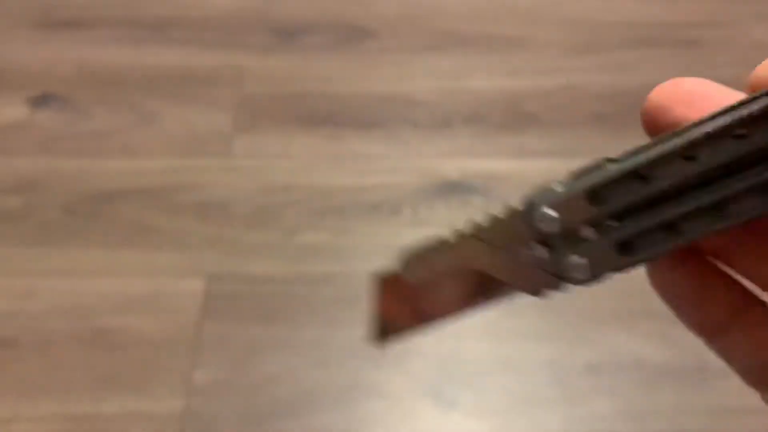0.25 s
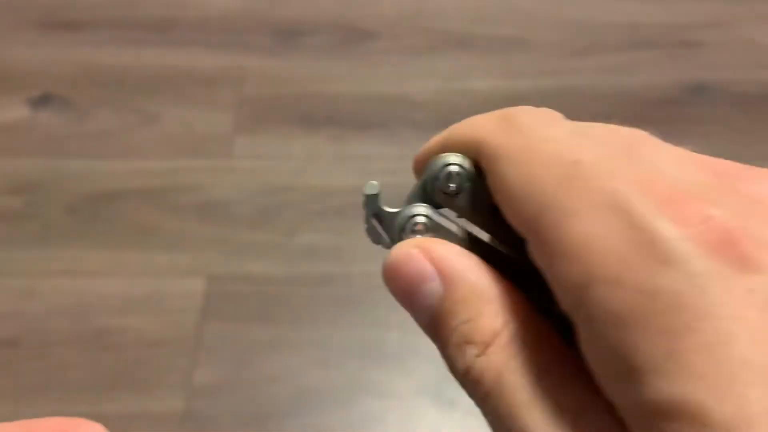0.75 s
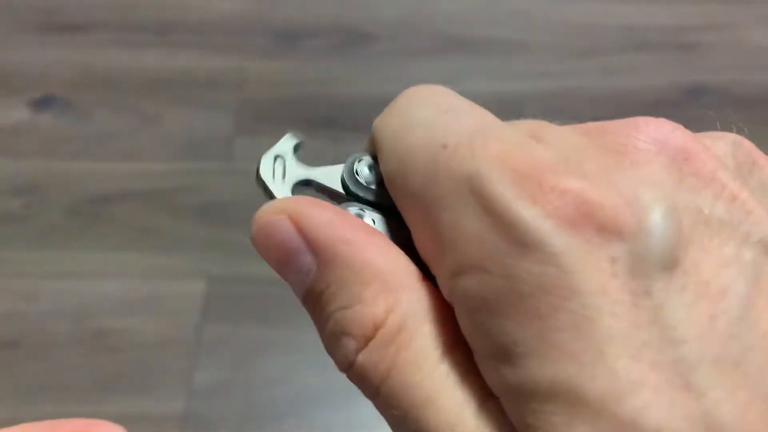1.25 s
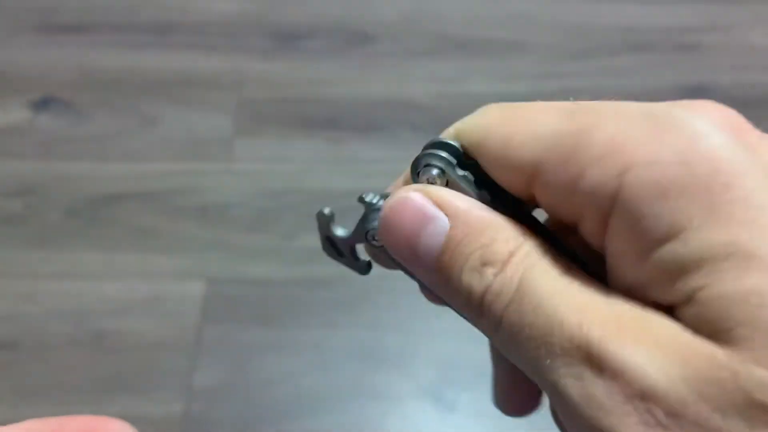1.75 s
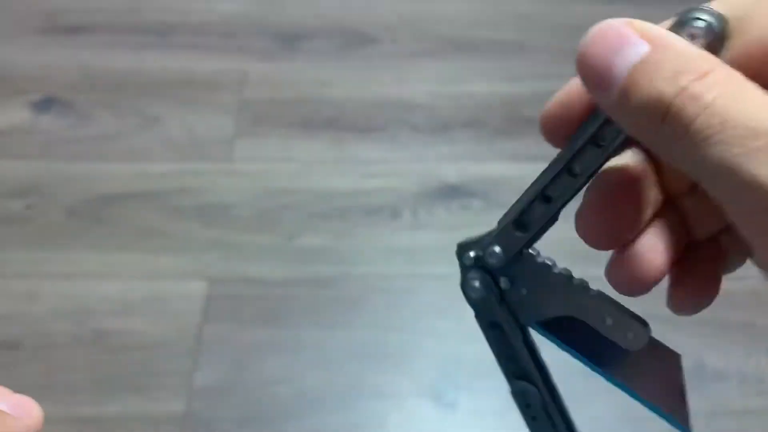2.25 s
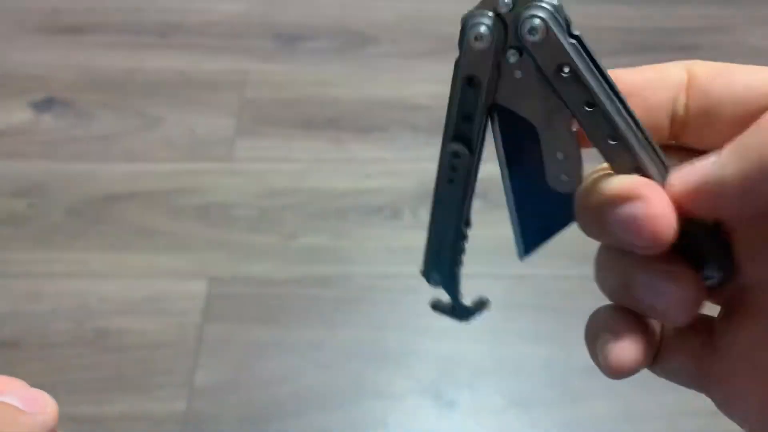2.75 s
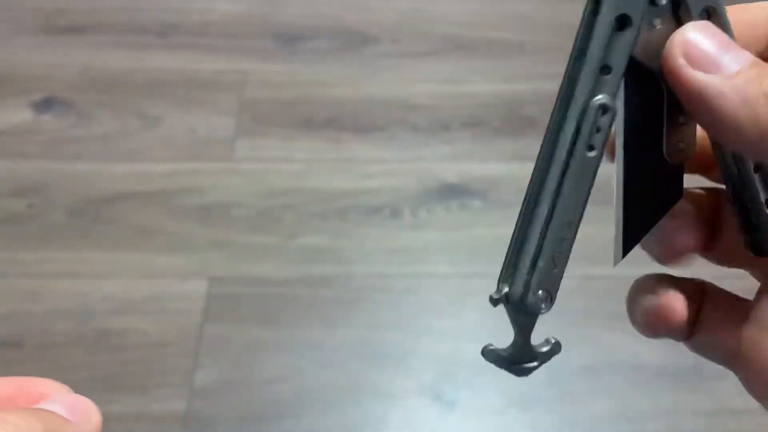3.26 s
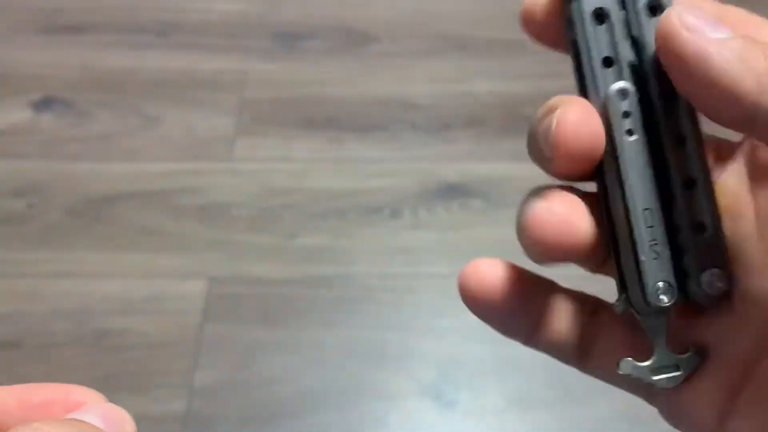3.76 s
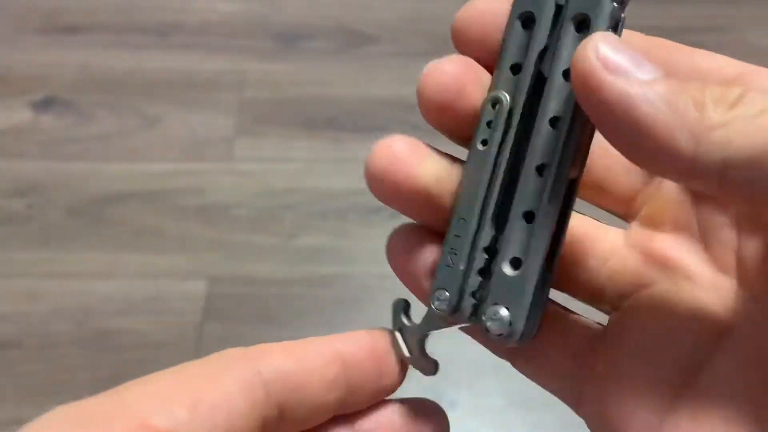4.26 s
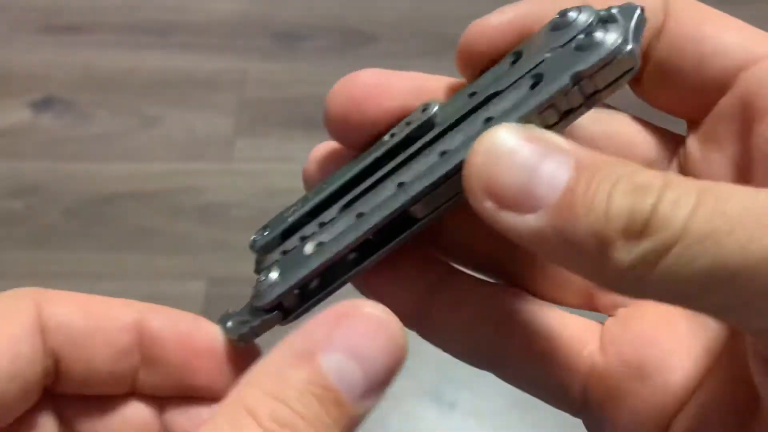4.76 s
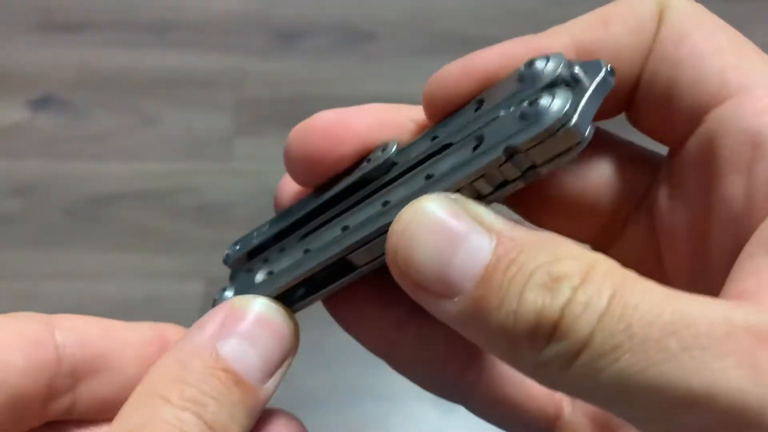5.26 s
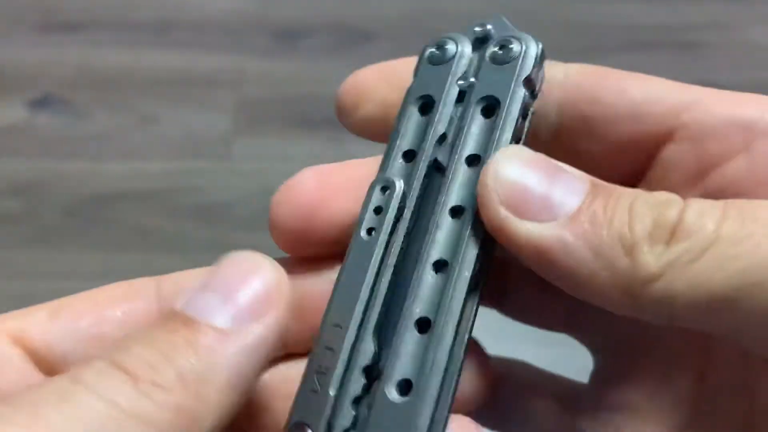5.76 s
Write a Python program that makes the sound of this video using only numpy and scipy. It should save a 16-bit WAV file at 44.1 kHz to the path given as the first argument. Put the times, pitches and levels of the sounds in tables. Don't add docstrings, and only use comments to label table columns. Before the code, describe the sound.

Small steel folding knife handled close up: sparse bright clicks, a sharp latch snap, then two hard metallic clacks in a quiet bare room.

```python
import sys
import numpy as np
from scipy import signal
from scipy.fft import rfft, irfft, next_fast_len
from scipy.io import wavfile
from scipy.ndimage import uniform_filter1d, map_coordinates

SR = 44100
rng = np.random.default_rng(int(sys.argv[2]) if len(sys.argv) > 2 else 0)


def master_out(mix):
    frames = np.transpose(np.atleast_2d(mix))
    ceiling = np.clip(frames, -1, 1)
    pcm = np.round(ceiling * 32767).astype(np.int16)
    wavfile.write(sys.argv[1], SR, pcm)


def how_loud(loudness_db):
    steps = np.asarray(loudness_db, float) / 20
    return 10 ** steps


N = 264732

# time_s, level_db
HOLDER_SHAKE = [(0.0, -74.5), (0.03, -64.5), (1.08, -66.5), (1.19, -45.5), (1.27, -56), (1.3, -42.5),
                (2.22, -62), (3.42, -63.5), (3.59, -59), (3.93, -85), (4.16, -57), (4.53, -68.5),
                (4.56, -63), (4.83, -73), (5.08, -57), (5.35, -56), (5.38, -65), (6.0, -59.5)]
# freq_hz, density_db
SWAY_SPECTRUM = [(10, -62), (25, -15), (33, -10), (45, 0.5), (55, -3.5), (70, -9), (90, -20.5),
                 (130, -49.5), (200, -120)]
# freq_hz, density_db
HUM_SPECTRUM = [(35, -33.5), (60, -0.5), (131, -4.5), (141, -10.5), (152, -12), (183, -8.5), (231, -21),
                (247, -14.5), (265, -15.5), (276, -16.5), (290, -25.5), (318, -25.5), (450, -37.5),
                (580, -74), (990, -120)]
# freq_hz, density_db
HISS_SPECTRUM = [(300, -16.5), (450, 11.5), (1000, 3), (3000, 0.5), (6000, -4), (8000, 1), (10000, -1),
                 (10700, 0), (12000, -2), (14500, -3.5), (15100, -7), (15700, -10), (15900, -46.5)]
TREMOR_DB, HUM_DB, HUM_DRIFT_DB, HISS_DB = 2.5, -59.5, 1.5, -79
HUM_FOLLOWS = 0.25

# middle_s, length_s, pitch_hz, level_db
PIVOT_WHINES = [(2.123, 0.04, 3750, -83), (2.561, 0.24, 10650, -84.5), (2.68, .06, 10600, -83),
                (0.689, .045, 1930, -76), (.688, .035, 4650, -83), (1.635, .04, 3600, -80)]
# middle_s, length_s, pitch_hz, level_db
SKIN_SQUEAKS = [(0.063, 0.03, 8420, -70.5), (0.071, 0.017, 12850, -65), (0.071, 0.024, 2040, -71.5),
                (0.558, 0.071, 11200, -82), (0.587, 0.05, 2780, -76), (1.606, 0.059, 11000, -77.5),
                (2.766, 0.018, 7200, -67.5), (3.02, 0.055, 11200, -76), (3.018, 0.047, 12900, -75),
                (3.026, 0.082, 3380, -85), (4.234, 0.074, 2800, -78.5), (4.533, 0.11, 2820, -79),
                (5.55, .04, 12300, -75), (5.971, 0.091, 6170, -77)]
# middle_s, length_s, pitch_hz, level_db
FINGER_BRUSHES = [(0.267, .03, 12000, -82), (0.68, 0.041, 13100, -72), (.6, 0.14, 7800, -78),
                  (0.678, 0.072, 7100, -74.5), (1.624, 0.028, 6100, -74.5), (2.771, 0.042, 12100, -73.5),
                  (3.172, 0.053, 12700, -83), (3.583, 0.04, 12700, -80), (3.814, 0.035, 10300, -73.5),
                  (3.894, 0.032, 12700, -79), (4.238, 0.028, 7800, -72.5), (4.842, 0.034, 7650, -77),
                  (5.228, 0.095, 7600, -77), (5.69, 0.024, 8070, -79.5)]
WHINE_WIDTH_HZ, SQUEAK_WIDTH_HZ, BRUSH_WIDTH_HZ = 252, 644, 4794

# start_s, peak_db, hollow_db, bright_db
LIGHT_CONTACTS = [(0.444, -66, 2, -28), (0.577, -47, -13.5, -14), (0.8414, -58.5, -14, 3),
                  (0.9444, -65, -7, -20), (1.0067, -53, 2, -16), (1.069, -56, -3, -23),
                  (1.129, -59, -2, -11), (1.1351, -56.5, -23, -12), (1.286, -52, -2, -9),
                  (1.6996, -45.5, -29, -14), (2.04, -57.5, -21, -3), (2.1552, -33, -19.5, -12),
                  (2.295, -55, -7, 1), (2.7602, -45.5, -31, -27), (2.868, -62.5, -13, -23),
                  (2.9786, -56.5, -19, -16), (3.7604, -44, -23.5, -11), (4.0518, -51.5, -18, -18),
                  (4.2478, -47, -14, -20), (4.255, -61, -10, -5), (5.0944, -72, -21, -6)]
# start_s, peak_db, hollow_db, bright_db
BOUNCES = [
    (1.173, -56, 4, -16),
    (2.1346, -55, -16, -29),
    (4.7251, -68, 6, -18),
    (5.2321, -59.5, -1.5, -9),
    (5.2451, -63, -2, -9.5),
    (5.2603, -12.5, -16, -3),
    (5.263, -19, -14, -6),
]
# start_s, peak_db, hollow_db, handle_db, latch_db
STRONG_CONTACTS = [
    (1.1788, -16.5, -22, -15, 6),
    (1.728, -29, -22, -12, 1.5),
    (2.149, -23.5, -26, -17.5, -6.5),
    (3.7167, -32, -22.5, -1.5, -16),
    (4.5763, -12.5, -30, -22.5, 0),
    (4.9967, -17, -16, 4.5, 1),
    (5.2597, -1, -21.5, 1, -1),
]
STRIKES = [1.1783, 1.7274, 2.1474, 3.7165, 4.5763, 4.9967, 5.2594]
# start_s, pitch_hz, level_db, t60_s
STEEL_MODES = [(1.1783, 6680, -25, 0.0093), (1.1783, 10560, -33, 0.01), (1.1783, 12100, -29, 0.011),
               (1.177, 14340, -23.5, 0.007), (1.7263, 7300, -33, 0.017), (1.7274, 8240, -37, 0.018),
               (1.7274, 11400, -44, 0.013), (1.7274, 12000, -39, 0.011), (2.1478, 2300, -44, 0.021),
               (2.1474, 8400, -30.5, 0.0097), (2.1471, 11270, -26.5, 0.014), (2.1474, 14750, -32, 0.013),
               (3.7165, 5450, -41.5, 0.009), (3.7156, 6300, -41.5, 0.017), (3.7165, 9260, -44, 0.011),
               (3.7165, 10700, -42, 0.013), (4.5763, 6500, -35, 0.008), (4.5763, 10000, -28, 0.0074),
               (4.5763, 11800, -34, 0.018), (4.5763, 14850, -29.5, 0.0086), (4.9967, 2670, -28, 0.0062),
               (4.9967, 5850, -28.5, 0.0053), (4.9967, 6800, -33.5, 0.013), (4.9967, 13720, -27.5, 0.007),
               (5.2593, 4340, -22.5, 0.009), (5.2593, 5300, -17, 0.009), (5.2593, 6320, -22, 0.009),
               (5.2593, 9640, -9, 0.007), (5.2593, 11310, -7.5, 0.007), (5.2593, 13800, -8, 0.007)]
# start_s, pitch_hz, level_db, t60_s
SINGING_PARTS = [
    (2.149, 14100, -50.5, 0.22),
    (2.15, 9550, -51.5, 0.13),
    (2.148, 3790, -54.5, 0.33),
    (2.149, 2540, -54, 0.2),
    (5.002, 2570, -61, 0.44),
    (4.588, 2950, -64, 0.17),
]
# start_s, pitch_hz, level_db, t60_s
HANDLE_KNOCKS = [(.945, 2500, -67, 0.021), (1.006, 2700, -77, 0.022), (1.068, 2610, -51, 0.014),
                 (1.178, 2510, -43, 0.026), (1.728, 1480, -64, 0.036), (1.727, 2420, -58, 0.044),
                 (2.1481, 2510, -40, 0.031), (2.1477, 2264, -49, 0.036), (2.759, 2310, -53, 0.013),
                 (2.869, 2260, -65, 0.024), (2.978, 2270, -58.5, 0.017), (3.7163, 2440, -63.5, 0.072),
                 (3.761, 3240, -63, 0.022), (4.051, 3640, -56.5, 0.058), (4.051, 1580, -70.5, 0.03),
                 (4.247, 2730, -72, 0.018), (4.5764, 2640, -44, 0.03), (4.5771, 2960, -41.5, 0.056),
                 (5.261, 3000, -37, 0.017)]
# start_s, pitch_hz, level_db, t60_s
HAND_THUDS = [(1.178, 65, -38.5, .12), (1.177, 240, -39, .04), (1.178, 750, -43.5, .025),
              (1.178, 437, -51, .012), (1.179, 1500, -50, .018), (1.179, 1900, -48, .018),
              (2.156, 1000, -64, .03), (2.155, 1550, -62, .03), (4.998, 476, -56, .025),
              (4.9975, 1050, -55, .02), (5.045, 600, -64, .03), (4.9972, 1750, -53, .012),
              (5.261, 190, -34.5, .04), (5.27, 60, -45.5, .15), (5.26, 700, -42, .02),
              (5.26, 1060, -41.5, .017), (5.2595, 1900, -34, .01)]
LIGHT_T60_S, STRONG_T60_S = 0.0098, 0.007
HARDENING = 0.0065
LATCH_DB = 2
HOLD_S = 0.00081
RATTLE_DB, RATTLE_T60_S = -33, 0.035

# start_s, density_db, tilt_db_per_octave, peak_hz, lift_db
WALL_ANSWERS = [
    (1.1783, -102, -3.5, 6400, 17),
    (1.7274, -114, 3, 9000, -18),
    (2.1474, -104, 2, 5500, 6.5),
    (3.7165, -113, -3.5, 5430, 10.5),
    (4.5763, -105, 2.5, 2950, 0),
    (4.997, -103, -1, 2466, 6),
    (5.2594, -83.5, 2, 3740, 5),
]
# freq_hz, level_db
WALL_COLOUR = [(250, -23.5), (600, -4.5), (2100, -3.5), (4300, 1.5), (9000, 1.5), (14600, -5.5),
               (15500, -16.5)]
# freq_hz, t60_s
ROOM_DECAY = [(300, 0.37), (1500, 0.32), (4000, 0.46), (9000, 0.37), (15000, 0.28)]
TOP_HZ = 15800
PATCHY_DB = 2
WET_DB = 28
TRIM_DB = -104

# freq_hz, likeness (0-1)
ROOM_LIKENESS = [(30, 1), (80, 0.95), (300, .8), (800, .1), (6000, .2), (7100, .99), (8200, 0.94),
                 (9300, 1), (10400, 1), (11600, 1), (13000, 1), (14000, 0.93), (15200, 0.93)]
# freq_hz, likeness (0-1)
NEAR_LIKENESS = [(400, 0.71), (800, 0.68), (4000, 0.35), (5000, 0.76), (7000, 0.94)]
# freq_hz, level_db (up on the left, down on the right)
LEFT_LEAN = [(300, -0.5), (700, 2), (2500, 2.63), (4000, 0.5)]


def unit(x):
    return x / np.sqrt(np.mean(x ** 2) + 1e-20)


def along(points, hz):
    f, v = np.transpose(points)
    return np.interp(np.log(hz + 1), np.log(f + 1), v)


def filtered(x, response):
    n = x.shape[-1]
    m = next_fast_len(n + 2048)
    return irfft(rfft(x, m) * response(np.fft.rfftfreq(m, 1 / SR)), m)[..., :n]


def noise(n, spectrum):
    return unit(filtered(rng.standard_normal((2, n)), lambda hz: how_loud(along(spectrum, hz))))


def wobble(rate):
    return map_coordinates(rng.standard_normal(200), [np.arange(N) * rate / SR])


def patchwork(x):
    return uniform_filter1d(uniform_filter1d(x, size=5, axis=0), size=7, axis=1)


def stereo(pair, likeness):
    def turn(hz):
        angle = np.arccos(np.clip(along(likeness, hz), -1, 1)) / 2
        return np.array([np.cos(angle), np.sin(angle)])

    mid, side = filtered(pair, turn)
    return np.array([mid + side, mid - side])


def add(track, s, x):
    part = track[:, max(round(s * SR), 0):][:, :x.shape[1]]
    part += x[:, :part.shape[1]]


def background():
    shake_s, shake_points_db = np.transpose(HOLDER_SHAKE)
    shake_db = np.interp(np.arange(N) / SR, shake_s, shake_points_db)
    sway_db = shake_db + TREMOR_DB * wobble(6.2)
    hum_db = HUM_DB + HUM_FOLLOWS * (shake_db - shake_db.mean()) + HUM_DRIFT_DB * wobble(5)
    sway = how_loud(sway_db) * noise(N, SWAY_SPECTRUM)
    hum = how_loud(hum_db) * noise(N, HUM_SPECTRUM)
    return sway + hum + how_loud(HISS_DB) * noise(N, HISS_SPECTRUM)


def rub(length, hz, db, width):
    t = np.arange(-SR // 5, SR // 5) / SR
    grain_db = 2.8 * np.repeat(rng.standard_normal(len(t) // 40 + 1), 40)[:len(t)]
    grains = rng.standard_normal((2, len(t))) * how_loud(grain_db)

    def resonance(f):
        return (f < TOP_HZ) * (f > 900) / (1 + (0.67 * (f - hz) / width) ** 2) ** 4.2

    return t[0], how_loud(db) * np.exp(-(2 * t / length) ** 2) * unit(filtered(grains, resonance))


def fingers():
    out = np.zeros((2, N))
    for width, rubs in [(WHINE_WIDTH_HZ, PIVOT_WHINES), (SQUEAK_WIDTH_HZ, SKIN_SQUEAKS),
                        (BRUSH_WIDTH_HZ, FINGER_BRUSHES)]:
        for s, length, hz, db in rubs:
            lead, swell = rub(length, hz, db, width)
            start = s + lead
            add(out, start, swell[:, max(-round(start * SR), 0):])
    return out


def ring(hz, db, t60, rise):
    t = np.arange(min(round(2 * t60 * SR), SR // 2)) / SR
    envelope = how_loud(db - 60 * t / t60) * (1 - np.exp(-t / rise))
    return envelope * np.sin(2 * np.pi * (hz * t + np.array([[0], [1 / 4]])))


def room(colour, db, size=SR // 4):
    ripple = np.cumsum(rng.standard_normal(40))
    ripple = ripple[2:] - ripple[:-2]

    def uneven(f):
        return (f < TOP_HZ) * how_loud(1.1 * np.interp(f, np.linspace(0, SR / 2, 38), ripple))

    hz, t, z = signal.stft(filtered(noise(size, colour), uneven), SR, nperseg=128)
    echoes = uniform_filter1d(rng.standard_normal(z.shape[1:]), size=3, axis=0)
    patches = unit(uniform_filter1d(echoes, size=9, axis=1))
    decay_db = 60 * t / along(ROOM_DECAY, hz)[:, None]
    tail = signal.istft(z * how_loud(db + PATCHY_DB * patches - decay_db), SR, nperseg=128)[1]
    tail = tail * (1 - 0.5 * np.exp(-np.arange(tail.shape[1]) / SR / 0.02))
    return np.pad(tail, ((0, 0), (round(0.0119 * SR), 0)))


def onset(s):
    return min(STRIKES, key=lambda when: abs(when - s))


def contact(db, low_db, middle_db, top_db, t60):
    t = np.arange(2048) / SR
    colour = [(800, low_db - 31), (2800, low_db + 13.5), (4000, min(low_db, middle_db) + 6.5),
              (5800, middle_db + 3.0), (10000, -5.5), (14500, top_db), (16000, top_db - 6.0), (17000, -44.0)]
    crack_decay = how_loud(-60 * np.maximum(t - HOLD_S, 0) / t60)
    rattle_decay = how_loud(RATTLE_DB - 60 * t / RATTLE_T60_S)
    shape = (crack_decay + rattle_decay) * (1 - np.exp(-t / 0.00054))
    crack = how_loud(db - 7.5) * unit(shape * noise(len(t), colour)) * np.sqrt(np.mean(shape ** 2))
    scrape = how_loud(db - 47 - 60 * t[::-1] / 0.05) * noise(len(t), colour)
    return np.hstack([scrape, crack]), colour


def contacts(near, far):
    lead = 2048 / SR
    for s, db, *parts_db in STRONG_CONTACTS:
        t60 = STRONG_T60_S * (1 - HARDENING * (db + 14.0))
        add(near, onset(s) - lead, contact(db, *parts_db, t60)[0])
    for s, db, low_db, bright_db in [*LIGHT_CONTACTS, *BOUNCES]:
        sound, colour = contact(db, low_db, bright_db - LATCH_DB, bright_db + LATCH_DB, LIGHT_T60_S)
        add(near, s - lead, sound)
        add(far, s, room(colour, db - 42.5))


def handle_knocks(near, far):
    for s, hz, db, t60 in [*HAND_THUDS, *HANDLE_KNOCKS]:
        add(near, s, ring(hz, db, t60, rise=0.00043))
        colour = [(hz * 0.8, -24), (hz, 0), (hz * 1.25, -24), (hz * 2, -60)]
        add(far, s, room(colour, db - WET_DB))


def steel_modes(near):
    for s, hz, db, t60 in STEEL_MODES:
        add(near, onset(s), ring(hz, db, min(t60, 0.012), rise=0.00033))


def wall_answers(far):
    hz = np.geomspace(150, 17000, 200)
    for s, level_db, tilt_db, best_hz, lift_db in WALL_ANSWERS:
        lift = lift_db * np.exp(-(np.log(hz / best_hz) / 0.11) ** 2)
        power = how_loud(level_db + along(WALL_COLOUR, hz) + tilt_db * np.log2(hz / 4300) + lift) ** 2
        for when, mode_hz, db, t60 in STEEL_MODES:
            if onset(when) == onset(s):
                power = power + how_loud(db - 68.5) ** 2 * np.exp(-(np.log(hz / mode_hz) / 0.088) ** 2)
        energy = np.sum(power * np.gradient(hz))
        colour = np.transpose([hz, 10 * np.log10(power)])
        add(far, onset(s), room(colour, 10 * np.log10(energy), size=SR // 2))


def singing_parts(near):
    for s, hz, db, t60 in SINGING_PARTS:
        flutter = map_coordinates(rng.standard_normal(80), [np.linspace(0, 60, SR // 2)])
        tone = ring(hz, db, t60, rise=0.0049)
        add(near, s, tone * (0.78 + 0.6 * flutter[:tone.shape[1]]))


def knife():
    near, far = np.zeros((2, N)), np.zeros((2, N))
    contacts(near, far)
    handle_knocks(near, far)
    steel_modes(near)
    wall_answers(far)
    singing_parts(near)
    return near, far


def trimmed(x):
    z = signal.stft(x, nperseg=256)[2]
    power = np.abs(patchwork(np.mean(np.abs(z) ** 2, 0)))
    return signal.istft(z * power / (power + how_loud(TRIM_DB) ** 2), nperseg=256)[1][:, :N]


def scene():
    floor, rubbing = background(), fingers()
    near, far = knife()
    sides = np.array([[1], [-1]])
    close = stereo(near + rubbing, NEAR_LIKENESS)
    leaning = filtered(close, lambda hz: how_loud(along(LEFT_LEAN, hz) * sides))
    return leaning + stereo(trimmed(far) + floor, ROOM_LIKENESS)


def low_pass(x):
    return signal.sosfilt(signal.butter(12, 17020, fs=SR, output="sos"), x)


def record(dry):
    def port_delay(hz):
        lag_s = 0.000215 * np.clip((hz - 500) / 1500, 0, 1)
        return np.exp(1j * np.pi * hz * lag_s * np.array([[-1], [1]]))

    ports = filtered(np.pad(dry, ((0, 0), (64, 0))), port_delay)
    return low_pass(ports[:, 64:])


dry = scene()
out = record(dry)
master_out(out)
```